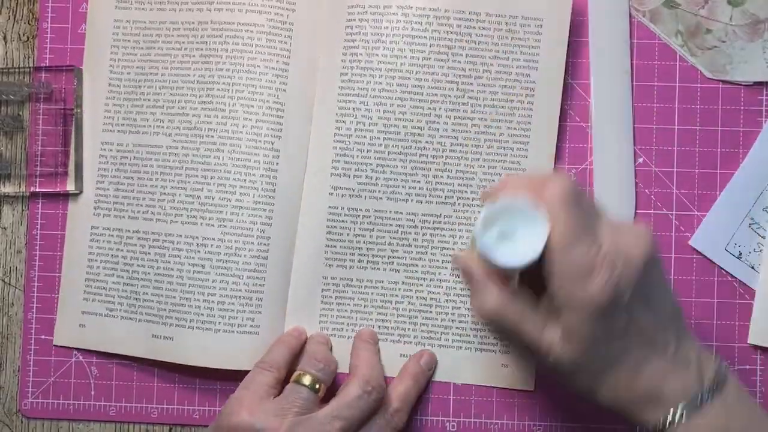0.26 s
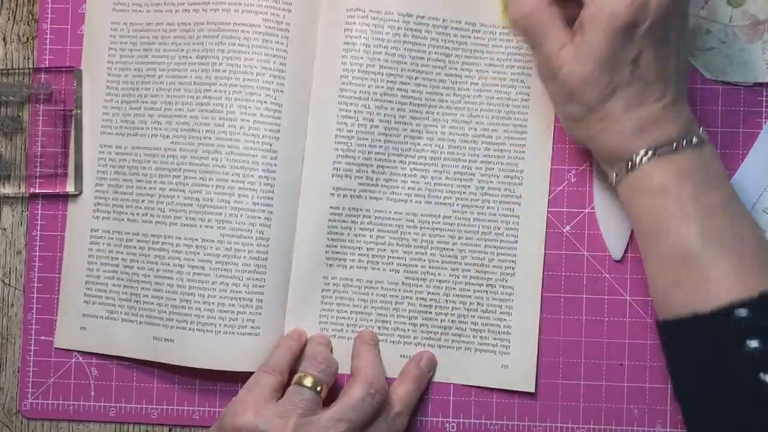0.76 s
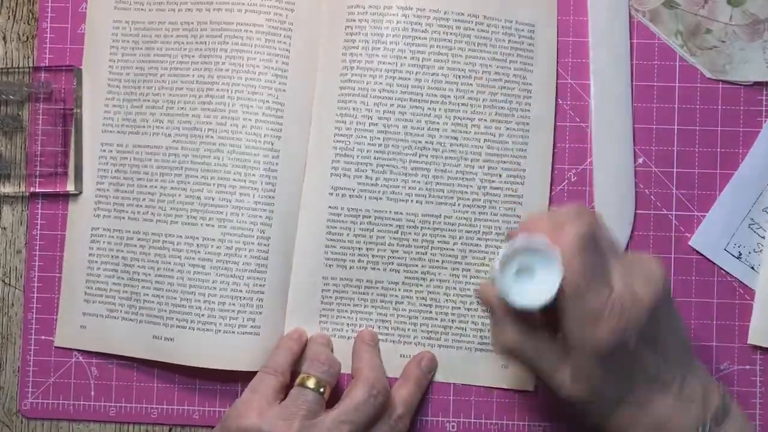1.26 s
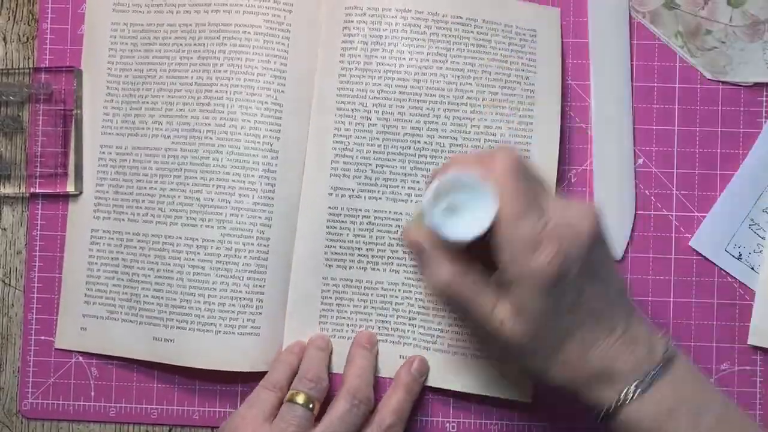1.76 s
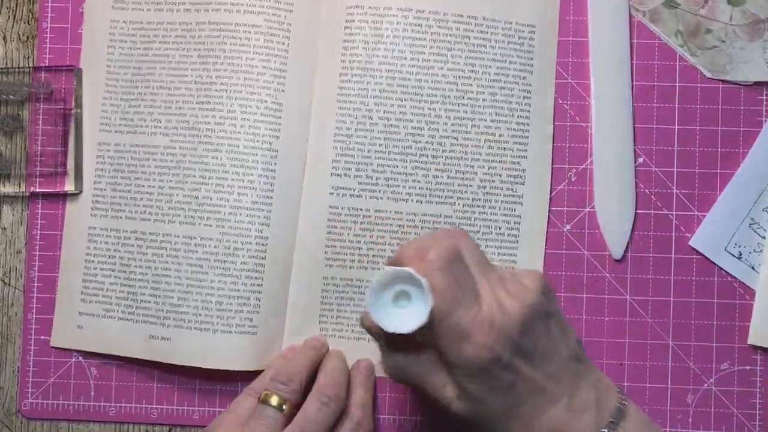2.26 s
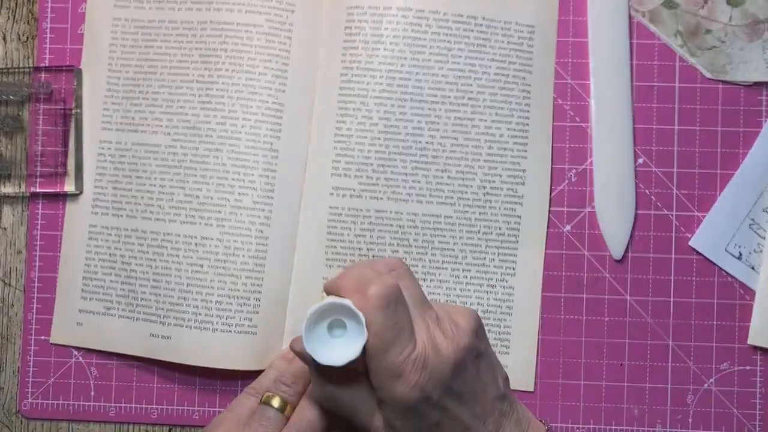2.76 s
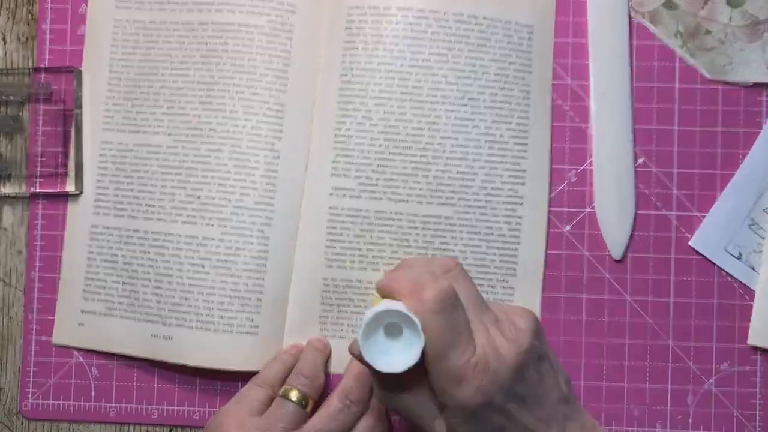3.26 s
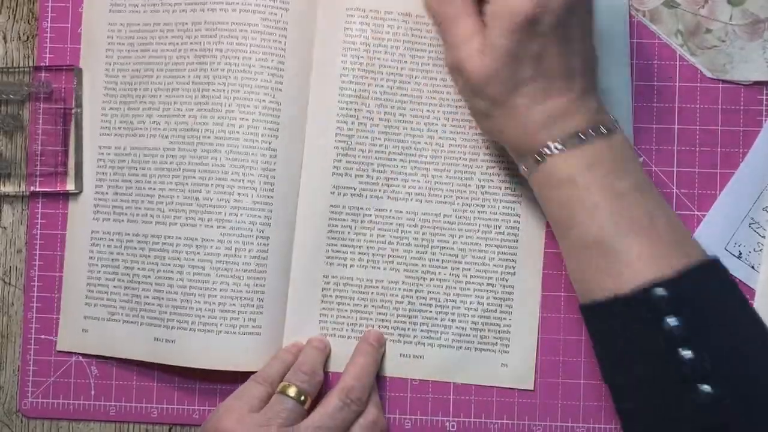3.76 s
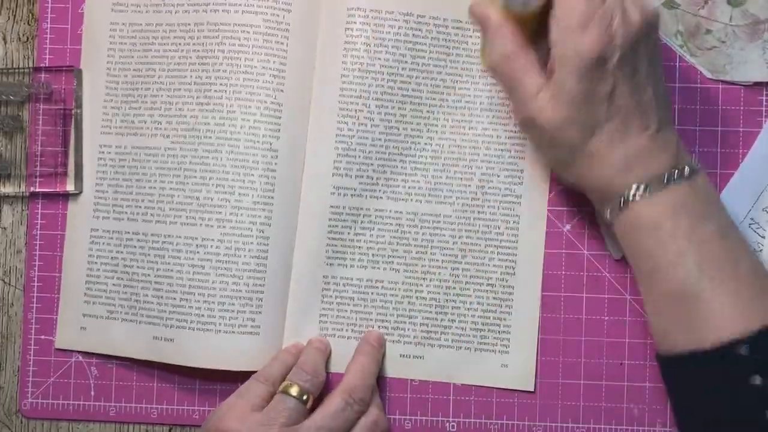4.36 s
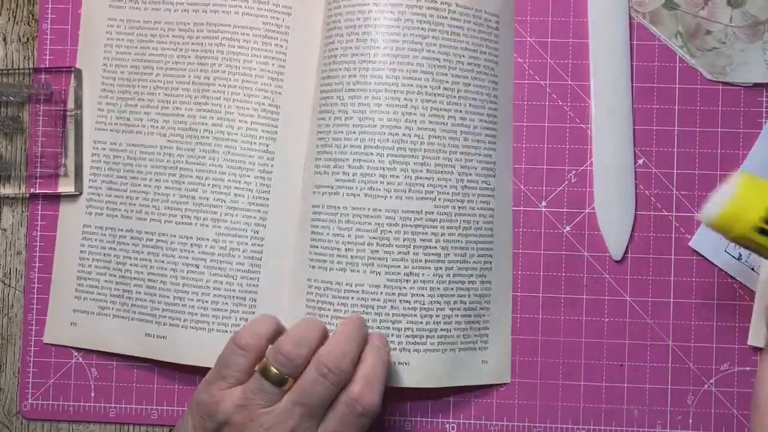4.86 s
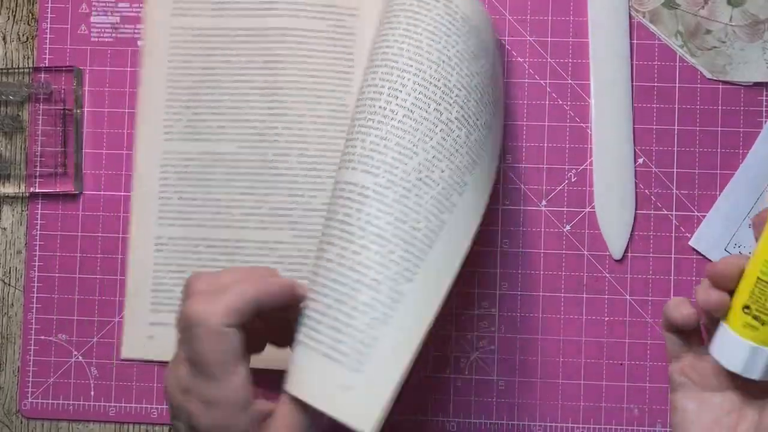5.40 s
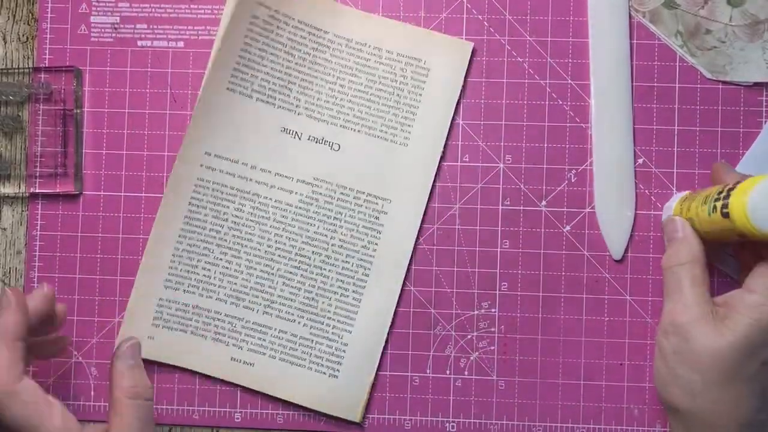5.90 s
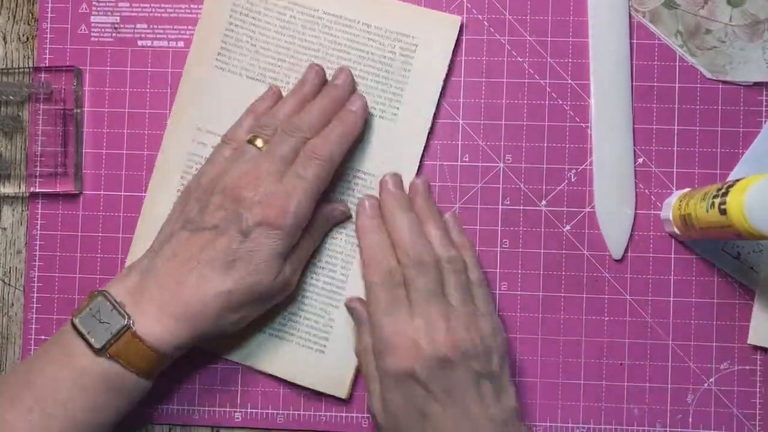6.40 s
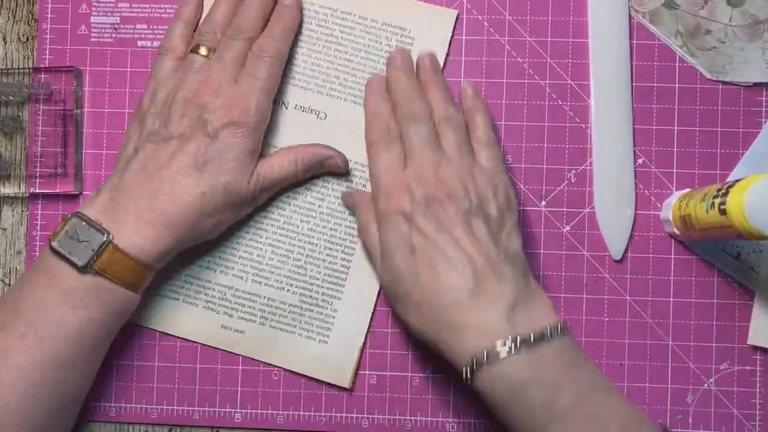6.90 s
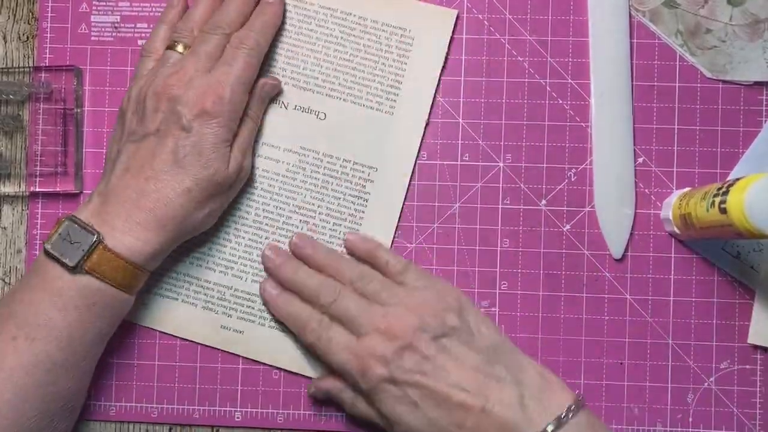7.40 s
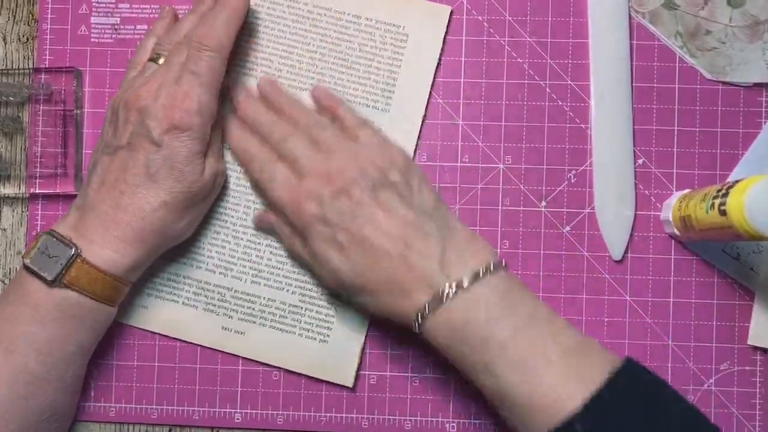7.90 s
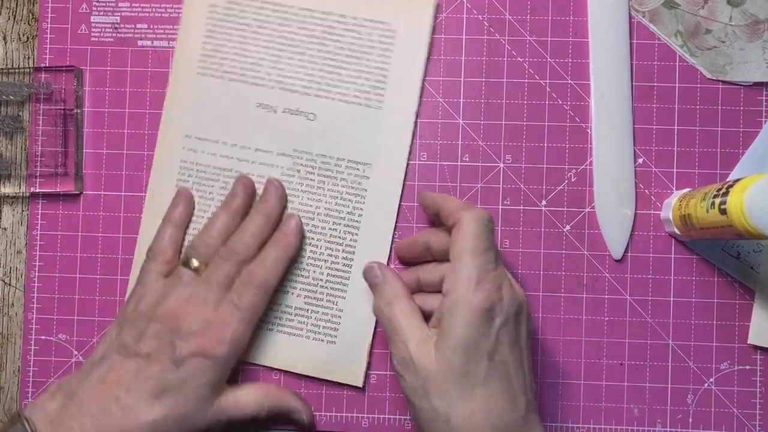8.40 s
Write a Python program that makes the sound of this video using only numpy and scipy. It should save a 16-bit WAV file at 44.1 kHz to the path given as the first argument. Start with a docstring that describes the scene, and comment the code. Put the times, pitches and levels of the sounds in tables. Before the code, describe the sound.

Close up in a small quiet room, a glue stick drags over a thin old page in short, dull, slightly sticky strokes, with small ticks, scuffs and soft low knocks on a matted table. The sheet is then turned with a flexing rustle and a sharp crack, lands softly, and dry palms smooth it in bright, swishing back-and-forth rubs.

```python
"""Glue stick on a book page

A glue stick is dabbed and dragged over a page on a cutting mat, heard close by in a small room.
Landings ring table modes; strokes are noise with tiny slips; scuffs and snaps excite short resonances.
The page is folded over with a swish and a crack, and palms smooth it with dense bright friction.
Table murmur, room reflections and faint air noise lie around it."""
import sys
import numpy as np
from scipy import signal
from scipy.fft import rfft, irfft, next_fast_len
from scipy.io import wavfile

SR = 44100
rng = np.random.default_rng(int(sys.argv[2]) if len(sys.argv) > 2 else 0)


def dump_mix(stems):
    """Bounce the given channels to the path in sys.argv[1] as a 16-bit WAV at rate SR."""
    frames = np.atleast_2d(stems).T  # one column per channel
    limited = np.clip(frames, -1, 1)  # hard clip at full scale
    pcm = np.round(limited * 32767).astype(np.int16)
    wavfile.write(sys.argv[1], SR, pcm)


N = 381465
TIME_S = np.arange(N) / SR

# Strokes over the page, mostly of the stick; the row at 4.55 s is fingers on the page. Each row: start in
# seconds, length in seconds, place of top speed as a fraction of the length, rub level in dB, hiss level in dB,
# table murmur level in dB.
STICK_STROKES = [(0.0, .19, .06, -65, -65, -68), (0.205, 0.16, 0, -65.5, -61, -84),
                 (0.57, 0.33, 0.72, -61, -63, -65), (0.858, 0.033, 0.8, -66, -50.5, -81),
                 (1.31, 0.38, 0.8, -65, -67.5, -71), (1.72, 0.26, .7, -75, -56.5, -72),
                 (2.05, 0.11, 0.46, -47, -54.5, -60), (2.295, 0.13, 0.23, -64.5, -70, -72.5),
                 (2.41, 0.17, 0.2, -71.5, -75, -76.5), (2.8, 0.18, 0, -60, -68.5, -66.5),
                 (2.98, 0.23, 0.9, -75, -75, -85.5), (3.44, .28, 0.7, -55, -68, -59.5),
                 (3.72, 0.11, 0.4, -72.5, -70.5, -84), (4.17, 0.34, 0.62, -61.5, -68, -60),
                 (4.55, 0.4, 0, -55, -60, -72)]
RUB_FLOOR_DB = -92.5  # constant faint dull noise floor under the strokes
# Short scuffs and grabs, with a sheet flex, a flap and a woody knock. Each row: start in seconds,
# level in dB, fading time in seconds, ring in Hz, treble in dB relative to the level.
SHORT_SCUFFS = [(0.008, -54.5, 0.025, 2500, -5), (0.134, -57, 0.017, 1720, -1.5),
                (0.218, -43.5, 0.012, 2650, 5), (0.239, -32, 0.009, 2810, 7),
                (0.955, -61.5, 0.013, 1240, -22), (0.999, -51.5, 0.038, 1330, -32),
                (1.55, -35, 0.01, 1900, -27), (1.736, -44, 0.031, 1400, -10),
                (1.857, -28, 0.0049, 2620, 10.5), (1.86, -36, 0.054, 1480, -28),
                (2.037, -55.5, 0.1, 1200, -12), (3.089, -60, 0.0086, 1520, 7.5),
                (3.232, -64, 0.004, 1890, -9.5), (3.539, -44.5, 0.028, 1300, -8),
                (3.601, -53, 0.01, 1180, -7), (3.655, -52, 0.0041, 1130, -18),
                (3.685, -48.5, 0.0054, 1340, -8), (3.846, -44, 0.026, 1400, -6.5),
                (4.309, -42, 0.0034, 1470, -24), (4.392, -36.5, 0.0071, 1130, -25),
                (4.547, -37.5, 0.0052, 2190, 7.5), (4.582, -46, 0.013, 1700, -27),
                (4.692, -37.5, 0.0065, 1480, -38), (4.722, -36.5, 0.01, 1560, -6.5),
                (4.837, -36.5, 0.011, 1470, -38), (5.227, -40.5, 0.016, 1090, -6),
                (5.301, -55.5, 0.04, 360, -18), (5.759, -54.5, 0.014, 1520, -10),
                (6.531, -52, 0.064, 1560, 8.5), (8.41, -50.5, 0.029, 1420, -17)]
# Every landing scuffs the page just before it reaches the table.
LAND_LEAD_S, LAND_FADE_S, LAND_RING_HZ, LAND_TREBLE_DB = 0.0076, 0.023, 1520, -13
# Snaps of tacky glue and buckling paper. Each row: time in seconds, body and ring level in dB,
# crack level in dB, ring of the page in Hz. Layer gains come on top.
PAGE_SNAPS = [(0.236, -23, -19, 3750), (0.2437, -15.5, -11.5, 2400), (0.352, -40, -34.5, 2230),
              (0.433, -42, -39.5, 1520), (1.0376, -22, -37.5, 1440), (1.2143, -16.5, -24, 1400),
              (1.5528, -28.5, -54, 1740), (1.7703, -23, -28, 1450), (1.8228, -32.5, -31, 2680),
              (1.871, -10.5, -35, 2040), (2.0674, -13.5, -23.5, 1385), (2.0833, -30.5, -23, 1470),
              (2.821, -20, -56, 1200), (3.3316, -48.5, -36.5, 1350), (4.2645, -58, -35.5, 3240),
              (4.516, -40.5, -32.5, 2410), (4.5507, -21.5, -13, 2860), (4.6203, -29.5, -54, 1430),
              (5.471, -14.5, -25, 2720), (5.4774, -5, -14, 3330), (5.4897, -8, -10, 1930),
              (5.5871, -24.5, -42, 1480), (5.8524, -24, -41, 1890)]
# Landings of the stick, page or a hand. Each row: time in seconds, thump level in dB,
# hardness as the corner of the blow in Hz, scuff level in dB.
LANDINGS = [(0.4357, -16, 564, -49), (1.217, -23, 150, -44), (2.0634, -18, 386, -35.5),
            (2.8051, -18.5, 254, -38), (3.336, -16, 210, -52.5), (4.1355, -17.5, 297, -38),
            (5, -47.5, 324, -51.5), (5.859, -19.5, 135, -41.5), (6.57, -15.5, 59, -59),
            (6.909, -34.5, 290, -67), (7.416, -25, 51.7, -80), (8.416, -37, 700, -53.5)]
# Table modes. Each row: frequency in Hz, relative level in dB, t60 in seconds.
TABLE_MODES = [(50.1, -19, 0.33), (82, -22.5, 0.22), (109, 10.5, 0.06), (128.2, -2, 0.18),
               (262.6, -5, 0.091), (302.3, -12.5, 0.13), (381.7, -12, 0.062), (450.5, -17, 0.13),
               (490, -29, 0.068)]
# Sweeps of fingers or a palm over the sheet. Each row: start in seconds, length in seconds, place of top
# speed as a fraction of the length, rub level in dB, hiss level in dB, table murmur level in dB.
PALM_SWEEPS = [(4.77, 0.25, 0.68, -56.5, -58, -80), (5.09, .09, 0.44, -67, -64, -67.5),
               (5.93, 0.082, 0.36, -71, -69, -63), (6.135, .065, .7, -62.5, -53.5, -65.5),
               (6.385, 0.14, 0.63, -55.5, -48, -69), (6.53, 0.41, 0.44, -60, -47, -66),
               (6.87, 0.3, 0.39, -56, -43.5, -71), (7.18, 0.3, 0.54, -48, -38, -69),
               (7.49, .33, 0.26, -56, -40.5, -74.5), (7.8, .23, 0.64, -52, -42.5, -69),
               (7.98, .2, 0.68, -60.5, -41.5, -84), (8.17, .19, 0, -79, -68, -101.5),
               (8.44, .13, .5, -54.5, -46, -63), (8.56, 0.12, 0.15, -56, -55.5, -69)]
# The page lifted and folded over. Each row: time in seconds, flexing sheet level in dB, hiss level in dB.
FOLD_LEVELS = [(5.2, -67.5, -63), (5.236, -43.5, -51), (5.375, -54, -50), (5.451, -31.5, -53),
               (5.488, -35, -29), (5.505, -49.5, -54), (5.72, -63.5, -58), (5.85, -62.5, -52.5),
               (5.94, -68.5, -73)]
# Moving ring of the curled page. Each row: time in seconds, frequency in Hz.
CURL_RING = [(5.22, 1040), (5.35, 1163), (5.41, 950), (5.45, 1700), (5.49, 2600), (5.56, 1700), (6.2, 2200)]

# Spectrum of the dull rub of glue on paper. Each row: frequency in Hz, relative level in dB.
SLIDE_SPECTRUM = [(150, -39.5), (250, -4.5), (305, -1), (373, -8.5), (431, -1.5), (643, -16), (1170, -4),
                  (1590, -3.5), (1910, -8.5), (6000, -26), (7800, -58), (13200, -120)]
# Spectrum of sticky hiss, also used for scuffs and the fold. Each row: frequency in Hz, relative level in dB.
TACK_SPECTRUM = [(1500, -50), (3000, -10.5), (4200, -3.5), (5400, -0.5), (8200, 1), (10500, -1),
                 (12000, -4.5), (13500, -5), (16000, -5.5)]
# Spectrum of the table's murmur. Each row: frequency in Hz, relative level in dB.
RUMBLE_SPECTRUM = [(20, -33.5), (50, -5.5), (70, 1.5), (100, -0.5), (135, 1.5), (190, -6), (300, -9),
                   (600, -41), (1500, -47)]
# Spectrum of the scuff's body. Each row: frequency in Hz, relative level in dB.
SCUFF_SPECTRUM = [(80, -45), (200, -15.5), (400, -7), (700, -10), (1150, 5), (1900, -2), (3000, -11),
                  (4500, -29.5), (7000, -33), (14000, -60)]
# Spectrum of the snap's body, also used for catches. Each row: frequency in Hz, relative level in dB.
SNAP_SPECTRUM = [(100, -40.5), (400, -25), (800, -9), (1300, 7.5), (2200, 5.5), (3500, -0.5), (6000, -16.5),
                 (16000, -54.5)]
# Spectrum of the snap's crack. Each row: frequency in Hz, relative level in dB.
CRACK_SPECTRUM = [(500, -47.5), (2000, -29), (3500, -17), (5800, 11), (9500, 9), (12000, -0.5), (15000, 3)]
# Spectrum of a palm's rub. Each row: frequency in Hz, relative level in dB.
PALM_RUB_SPECTRUM = [(180, -38), (300, -18), (338, -15), (494, -14.5), (877, -18), (1070, -6), (1560, 0.5),
                     (2300, -7.5), (2680, 2), (4000, 2), (5200, 1), (8800, -120)]
# Spectrum of a palm's swish. Each row: frequency in Hz, relative level in dB.
PALM_HISS_SPECTRUM = [(1470, -52), (2500, -27.5), (3230, -15), (3570, -11), (5440, -4), (6920, -2.5),
                      (8870, 2.5), (10300, -0.5), (11800, -3), (12700, -1.5), (13900, -5), (15200, 0.5),
                      (16000, -38)]
# Spectrum of the flexing sheet. Each row: frequency in Hz, relative level in dB.
SHEET_SPECTRUM = [(100, -53), (220, -29.5), (310, -7), (480, -17.5), (700, -8), (1100, -2), (1500, -10),
                  (2300, -7.5), (3500, -11), (6000, -14), (8000, -17.5), (14000, -51.5)]
# Spectrum of the room air. Each row: frequency in Hz, relative level in dB.
AIR_SPECTRUM = [(15, -29), (25, 3), (141, -5.5), (607, -21.5), (818, -25.5), (1070, -19), (5430, -27.5),
                (8360, -22.5), (11900, -31), (14800, -25.5), (16000, -36)]
AIR_DB = -74
# Decay of the room tail. Each row: frequency in Hz, t60 in seconds.
ROOM_DECAY = [(100, 0.94), (700, 0.14), (2000, 0.2), (5000, 0.27), (14000, 0.061)]
# Phase between the microphone ports. Each row: frequency in Hz, lead of the left in radians.
PORT_LEAD = [(0, 0), (950, -0.5), (1210, -0.3), (2410, 1.0), (3530, 0.5), (5250, 3.0), (6290, 3.9),
             (7920, 5.9), (8870, 6.4), (11300, 9.2), (12300, 9.6), (12700, 10.2), (14500, 12.5),
             (16500, 12.7)]
# Level between the microphone ports. Each row: frequency in Hz, left minus right in dB.
PORT_TILT = [(60, 5.5), (110, 2), (200, -5.5), (380, -1), (700, -3), (1290, -1), (2380, -4), (4400, -2),
             (8120, 1), (15000, 0)]
EDGE_HZ = 16100


def amp(db):
    """Decibels to gain."""
    return np.exp(np.asarray(db) * np.log(10) / 20)


def unit(x):
    """Scales to rms 1."""
    return x / np.sqrt(np.mean(x ** 2) + 1e-20)


def read(points, hz):
    """Reads a table on a log-frequency axis."""
    f, value = np.transpose(points)
    return np.interp(np.log(hz + 1), np.log(f + 1), value)


def add(mix, start_s, sound):
    """Adds a sound to the mix at a time, or at the beginning if that is negative."""
    part = mix[max(round(start_s * SR), 0):][:len(sound)]
    part += sound[:len(part)]


def impulse(points, size=2048):
    """Causal minimum-phase impulse response with the given spectrum and energy 1."""
    hz = abs(np.fft.fftfreq(size, 1 / SR))
    log_gain = np.log(amp(np.maximum(read(points, hz), -100)))
    response = np.fft.ifft(np.exp(np.conj(signal.hilbert(log_gain)))).real
    return response / np.linalg.norm(response)


def colour(x, points):
    """Gives a white excitation a spectrum, keeping its level."""
    return signal.oaconvolve(x, impulse(points))[:N]


def resonate(x, hz, width_hz):
    """A fixed or moving resonance: shift hz down to zero, smooth, shift back."""
    turn = np.exp(2j * np.pi * np.cumsum(hz * np.ones(len(x))) / SR)
    r = np.exp(-np.pi * width_hz / SR)
    return 2 * (turn * signal.lfilter([1 - r], [1, -r], x / turn)).real


def resonate_twice(x, hz, width_hz):
    """A broad resonance followed by a narrow one at the same frequency."""
    return resonate(resonate(x, hz, 3 * width_hz), hz, width_hz)


def wander(per_s, count=4096):
    """Chance of rms 1 that drifts to a new value twice per_s times a second."""
    return unit(np.interp(2 * per_s * TIME_S, np.arange(count), rng.standard_normal(count)))


def friction(slips_per_s, spread_db, share, clump_db, clumps_per_s):
    """Fibres catch and let go: tiny slips of uneven size over a smooth rub, bunched by changing grip."""
    smooth, chance = rng.standard_normal(N), rng.random(N)
    slips, caught = np.zeros(N), chance < slips_per_s / SR
    hold = -np.log(chance[caught] * SR / slips_per_s + 1e-9)  # most fibres hold briefly, a few for long
    slips[caught] = np.sign(smooth[caught]) * amp(spread_db * np.minimum(hold, 4))
    share = np.clip(share, 0, 1)
    rub = np.sqrt(share) * unit(slips) + np.sqrt(1 - share) * smooth
    return unit(rub * amp(clump_db * wander(clumps_per_s)))


def catches(per_s=35, spread_db=5, fade_s=0.0051):
    """Now and then glue or skin catches on the paper and tears free in a tiny burst."""
    size = amp(spread_db * np.clip(rng.standard_normal(N), -2, 2))
    starts = (rng.random(N) < per_s / SR) * size
    envelope = signal.lfilter([1], [1, -np.exp(-1 / (fade_s * SR))], starts)
    return unit(envelope * rng.standard_normal(N))


def strokes(rows, rise_s, fall_s, swell_db):
    """Each stroke grips, speeds up, slows and lets go; rub, hiss and table murmur grow with its speed."""
    power = np.zeros((3, N))
    for start_s, length_s, crest, *levels_db in rows:
        t = np.arange(0, length_s + .1, 1 / SR)
        crest_s = length_s * np.clip(crest, .05, .95)
        speed = np.sin(np.pi / 2 * np.interp(t, [0, crest_s, length_s], [0, 1, 0]))
        contact = (1 - np.exp(-(t / rise_s) ** 2)) * np.exp(-np.maximum(t - length_s, 0) / fall_s)
        for layer, db, swell in zip(power, levels_db, swell_db):
            add(layer, start_s, (contact * amp(db + swell * (speed - 1))) ** 2)
    return np.sqrt(power)


def slide(rub, hiss, catch_db=-3):
    """Glue dragged over paper: a dull rub with small catches and a fine sticky crackle."""
    drag = friction(slips_per_s=1200, spread_db=1.0, share=0.66, clump_db=4, clumps_per_s=13)
    tack = friction(slips_per_s=770, spread_db=3, share=0.58, clump_db=4, clumps_per_s=10)
    dull = colour(rub * drag, SLIDE_SPECTRUM)
    tearing = amp(catch_db) * colour(rub * catches(), SNAP_SPECTRUM)
    return dull + tearing + colour(hiss * tack, TACK_SPECTRUM)


def murmur(weight, resting_db=-81, uneven_db=3, mat_db=-8, mat_hz=580, mat_width_hz=600):
    """The table murmurs under the hands, more when they move, and the mat adds a hollow rub."""
    push = (weight + amp(resting_db)) * unit(rng.standard_normal(N) * amp(uneven_db * wander(2.7)))
    mat = unit(resonate(resonate(push, mat_hz, mat_width_hz), mat_hz, mat_width_hz))
    return colour(push, RUMBLE_SPECTRUM) + amp(mat_db) * np.std(push) * mat


def scuffs(ring_width_hz=330, body_db=-3, ring_db=0, hiss_db=-4, brush=0.095, brush_s=0.007, taut_hz=1750):
    """Short judders swell, grab and die away, with a dull body, a ring and a hiss."""
    body, ring, hiss = np.zeros((3, N))
    t = np.arange(-SR // 40, SR // 6) / SR
    held_s = np.maximum(t, 0)
    slips = friction(slips_per_s=1600, spread_db=3, share=.6, clump_db=1.2, clumps_per_s=200)
    landings = [(s - LAND_LEAD_S, db, LAND_FADE_S, LAND_RING_HZ, LAND_TREBLE_DB) for s, _, _, db in LANDINGS]
    for s, db, fade_s, ring_hz, treble_db in SHORT_SCUFFS + landings:
        grab = (1 - np.exp(-held_s / .001)) * np.exp(-held_s / fade_s)
        grip = grab + brush * np.exp(-abs(t) / brush_s)
        judder = grip * slips.take(round(s * SR) + np.arange(len(t)), mode="wrap")
        strength = amp(db) * np.sqrt(np.mean(grip ** 2))
        fullness = min(1, (taut_hz / ring_hz) ** 2)  # a taut patch rings high, with little body
        add(body, s + t[0], strength * fullness * unit(judder))
        add(ring, s + t[0], strength * unit(resonate_twice(judder, ring_hz, ring_width_hz)))
        add(hiss, s + t[0], strength * amp(treble_db) * unit(judder))
    dull = amp(body_db) * colour(body, SCUFF_SPECTRUM)
    return dull + amp(ring_db) * ring + amp(hiss_db) * colour(hiss, TACK_SPECTRUM)


def snaps(rattle_s=0.0015, rattle=0.027, body_db=2, ring_db=10, ring_width_hz=700, crack_db=4):
    """Fibres strain for an instant and give way in one spike, which rings the taut page."""
    body, ring, crack = np.zeros((3, N))
    t = np.arange(-SR // 500, SR // 30) / SR
    for s, db, high_db, ring_hz in PAGE_SNAPS:
        release = rattle * rng.standard_normal(len(t)) * np.exp(-abs(t) / rattle_s) + (t == 0)
        add(body, s + t[0], amp(db) * release)
        add(ring, s + t[0], amp(db) * 2 * resonate_twice(release, ring_hz, ring_width_hz))
        add(crack, s + t[0], amp(high_db) * release)
    dull = amp(body_db) * colour(body, SNAP_SPECTRUM)
    return dull + amp(ring_db) * ring + amp(crack_db) * colour(crack, CRACK_SPECTRUM)


def thumps(rise_s=0.012, thud_db=-19, thud_s=0.028, thud_corner_hz=250):
    """Each blow rings the table, with a dull thud of the mat; a soft one reaches only the low modes."""
    out, t = np.zeros(N), np.arange(SR // 2) / SR
    swell = 1 - np.exp(-(t / rise_s) ** 2)  # the mat cushions the blow
    mat_band = signal.butter(2, [180, 520], "bandpass", fs=SR, output="sos")
    for s, db, corner_hz, _ in LANDINGS:
        ring = np.zeros(len(t))
        for hz, mode_db, t60_s in TABLE_MODES:
            mode = amp(mode_db - 60 * t / t60_s) * np.sin(2 * np.pi * hz * t)
            ring += mode / (1 + (hz / corner_hz) ** 3)
        mat = unit(signal.sosfilt(mat_band, rng.standard_normal(len(t))))
        thud = amp(thud_db) * mat * np.exp(-t / thud_s) / (1 + (thud_corner_hz / corner_hz) ** 3)
        add(out, s, amp(db) * (swell * ring + thud))
    return out


def palms(rub, hiss, catch_db=-5, sheet_db=-6, sheet_hz=1590, sheet_width_hz=300, body_db=-3.0):
    """Dry skin on paper: slips merge into a bright swish with a few catches; the pressed sheet rings."""
    skin = friction(slips_per_s=3000, spread_db=2, share=0.29, clump_db=1, clumps_per_s=31)
    ridges = friction(slips_per_s=5900, spread_db=4.5, share=0.27, clump_db=0.47, clumps_per_s=22)
    grain = unit(skin + amp(catch_db) * catches(per_s=34, spread_db=-0.5, fade_s=0.00245))
    sheet = unit(resonate_twice(grain, sheet_hz, sheet_width_hz))
    body = amp(body_db) * colour(rub * grain, PALM_RUB_SPECTRUM)
    return body + amp(sheet_db) * rub * sheet + colour(hiss * ridges, PALM_HISS_SPECTRUM)


def fold(sheet_db=-7, curl_db=-1, curl_width_hz=1100):
    """The page scrapes over the mat and flexes as it is turned, its curl ringing at a moving pitch."""
    s, *columns = np.transpose(FOLD_LEVELS)
    turning = (TIME_S >= s[0]) * (TIME_S <= s[-1])
    sheet, hiss = [amp(np.interp(TIME_S, s, db)) * turning for db in columns]
    slips = friction(slips_per_s=2000, spread_db=3, share=.55, clump_db=1, clumps_per_s=90)
    flat = colour(slips, SHEET_SPECTRUM)
    curl = unit(resonate(flat, np.interp(TIME_S, *np.transpose(CURL_RING)), curl_width_hz))
    crackle = friction(slips_per_s=900, spread_db=2.5, share=.55, clump_db=3, clumps_per_s=45)
    flexing = sheet * (amp(sheet_db) * flat + amp(curl_db) * curl)
    return flexing + colour(hiss * crackle, TACK_SPECTRUM)


def ports(x):
    """Two microphone ports hear the desk with a difference in phase and level."""
    size = next_fast_len(N)
    hz = np.fft.rfftfreq(size, 1 / SR)
    half = amp(read(PORT_TILT, hz) / 2) * np.exp(.5j * np.interp(hz, *np.transpose(PORT_LEAD)))
    pair = np.array([half, 1 / half])
    level = np.maximum(abs(pair.mean(0)), .7)  # evens out the mean of the two ports
    return irfft(rfft(x, size) * pair / level, size)[:, :N]


def room(x, early_db=-8, early_s=.005, tail_db=-13):
    """Quick sparse reflections, then a short tail that decays at its own rate in each band."""
    t = np.arange(SR // 2) / SR
    reflected = (rng.random((2, len(t))) < 4000 / SR) * (t > .001)
    taps = rng.standard_normal((2, len(t))) * reflected
    hz, frame_s, z = signal.stft(taps, SR, nperseg=256)
    decay = amp(-60 * frame_s / read(ROOM_DECAY, hz)[:, None])
    tail = signal.istft(z * decay, SR, nperseg=256)[1][:, :len(t)]
    early = taps * np.exp(-t / early_s)
    response = np.zeros((2, len(t)))
    for db, part in [(early_db, early), (tail_db, tail)]:
        response += amp(db) * part / np.linalg.norm(part, axis=1, keepdims=True)
    return signal.fftconvolve(x[None], response, axes=1)[:, :N]


def scene(width=0.32):
    """Paper sounds with their reflections, the table's bass, and still room air."""
    drag_rub, drag_hiss, drag_weight = strokes(STICK_STROKES, rise_s=0.02, fall_s=0.012, swell_db=(14, 9, 10))
    palm_rub, palm_hiss, palm_weight = strokes(PALM_SWEEPS, rise_s=.02, fall_s=0.012, swell_db=(9, 12, 5))
    floored_rub = drag_rub + amp(RUB_FLOOR_DB)
    rubbing, other = [slide(floored_rub, drag_hiss) + palms(palm_rub, palm_hiss) + fold() for _ in range(2)]
    paper = scuffs() + snaps() + rubbing
    table = thumps() + murmur(drag_weight + palm_weight)
    spread = width * np.array([other, -other])  # a broad sheet: each port hears other fibres too
    air = np.array([colour(rng.standard_normal(N), AIR_SPECTRUM) for _ in range(2)])
    return ports(paper + table) + spread + room(paper) + amp(AIR_DB) * air


def record(dry):
    """The recorder's bass roll-off and band limit."""
    lean = signal.sosfilt(signal.butter(4, 40, "highpass", fs=SR, output="sos"), dry)
    band = signal.firwin(511, EDGE_HZ, window=("kaiser", 9), fs=SR)
    return signal.oaconvolve(lean, band[None], "same", axes=1)


dry = scene()
out = record(dry)
dump_mix(out)
```